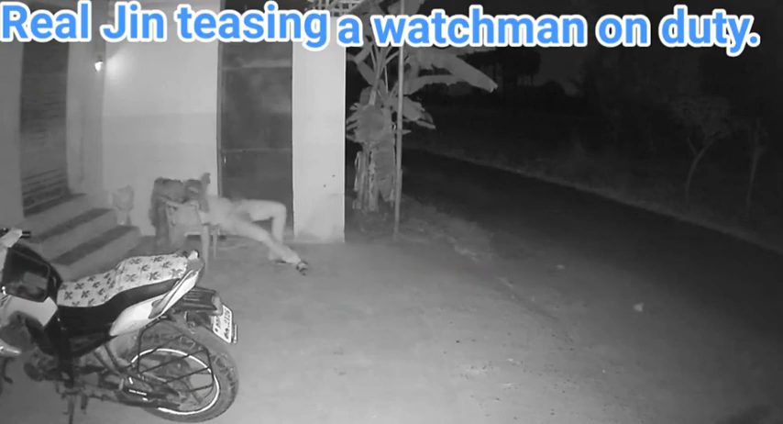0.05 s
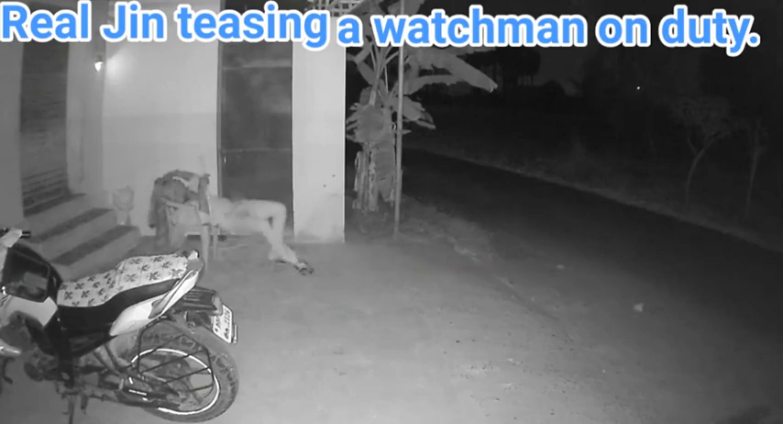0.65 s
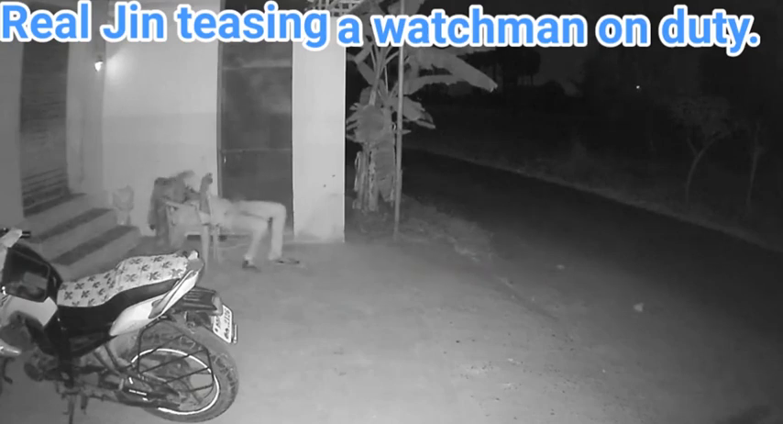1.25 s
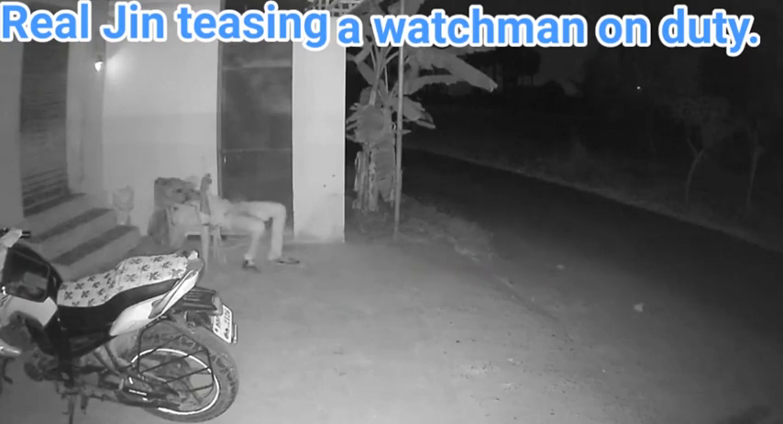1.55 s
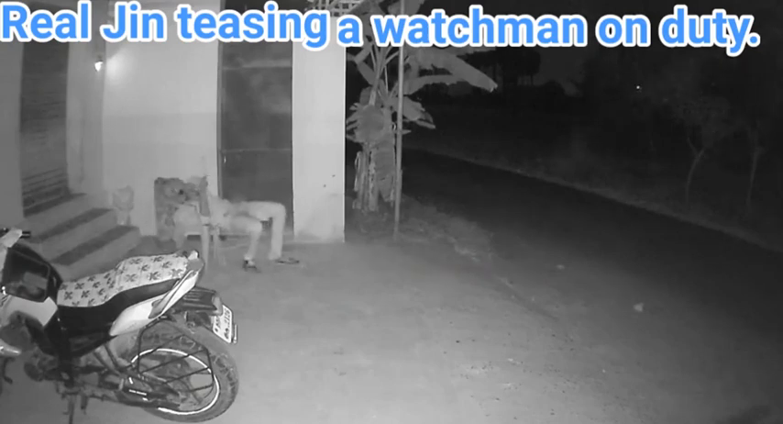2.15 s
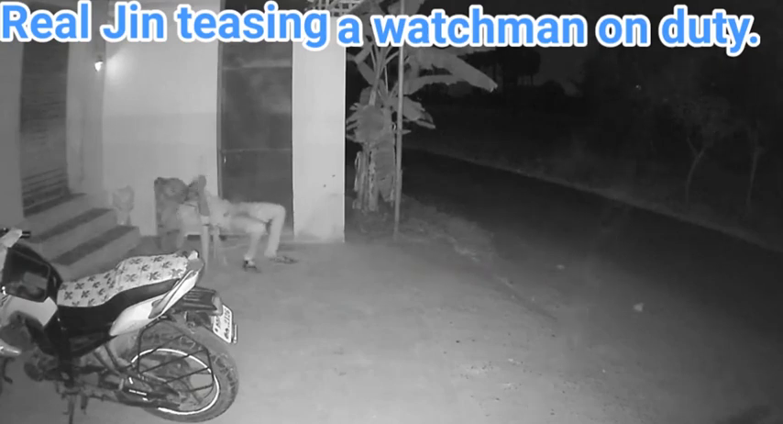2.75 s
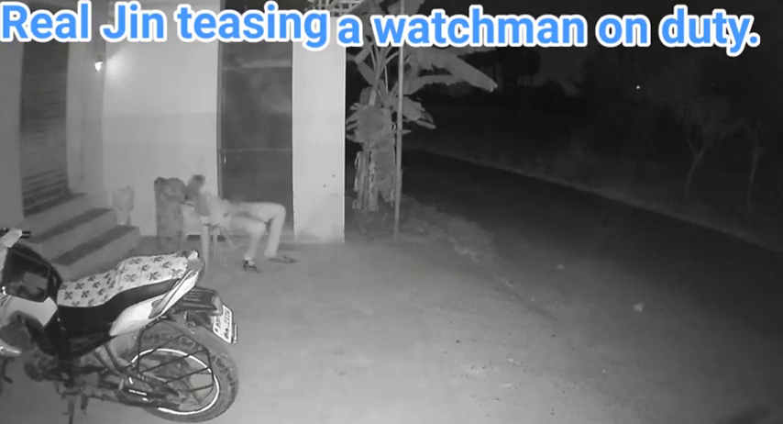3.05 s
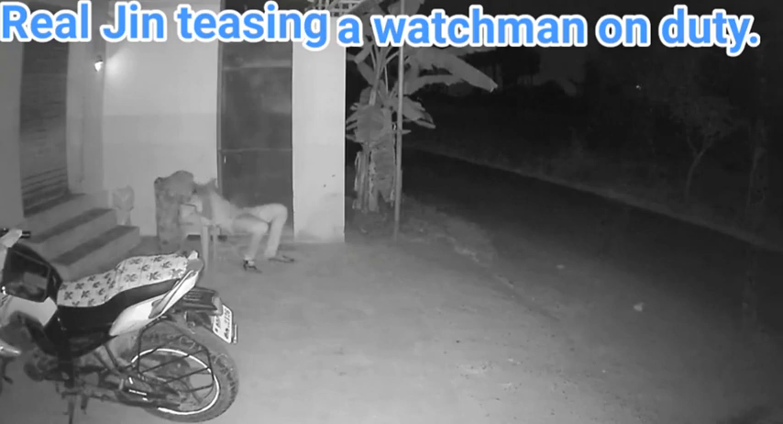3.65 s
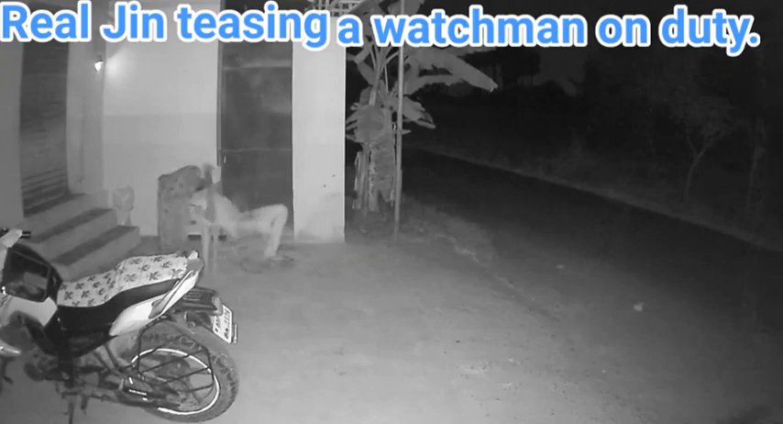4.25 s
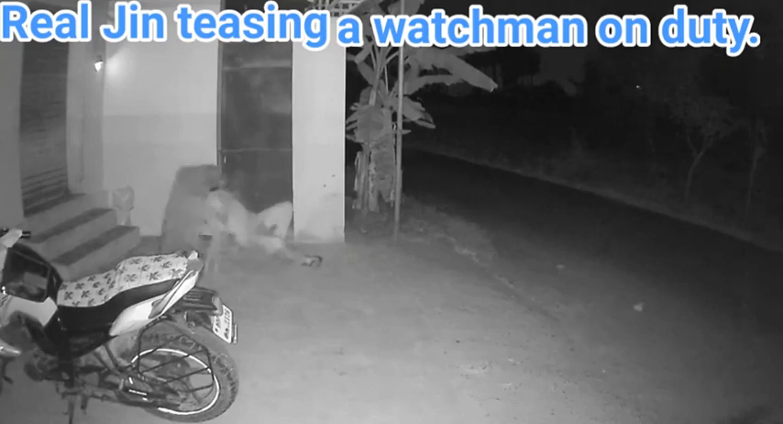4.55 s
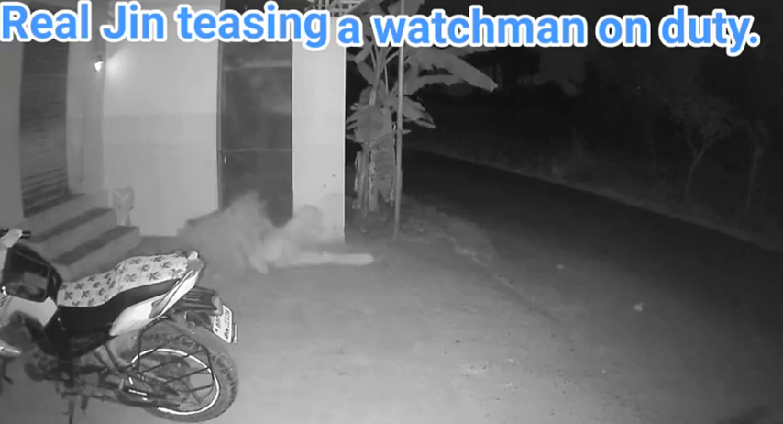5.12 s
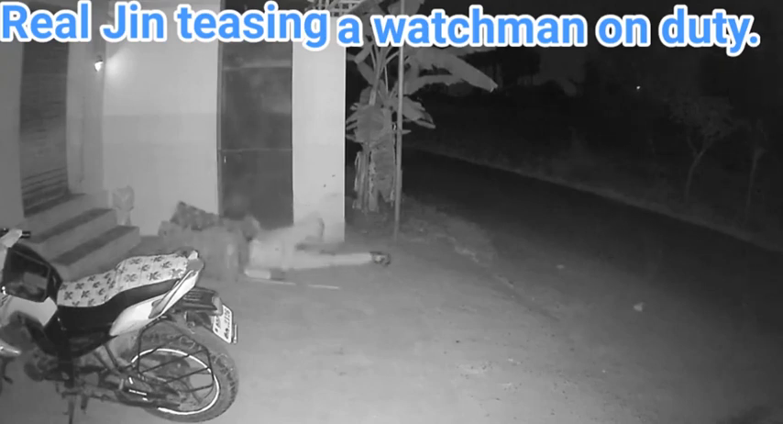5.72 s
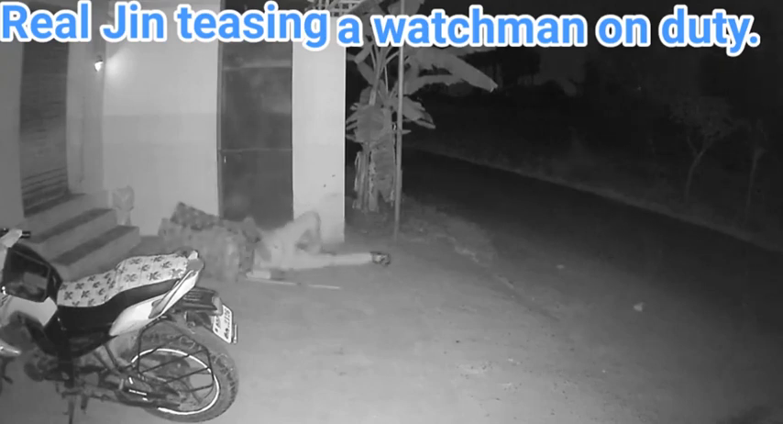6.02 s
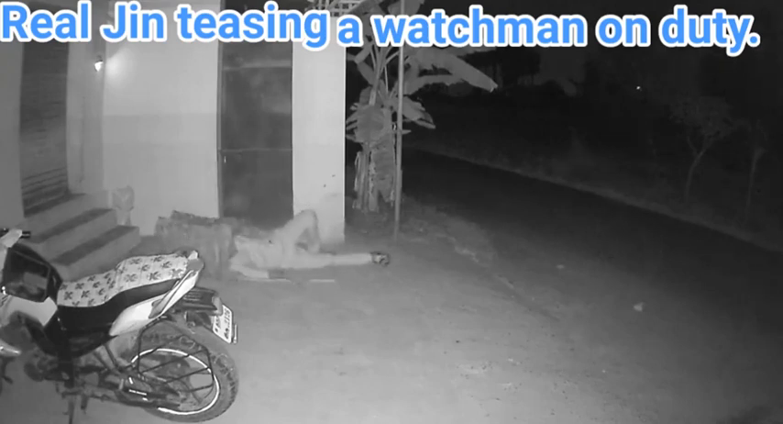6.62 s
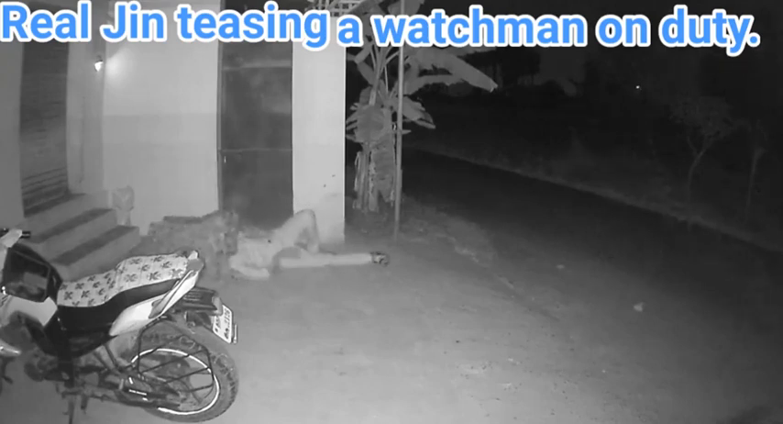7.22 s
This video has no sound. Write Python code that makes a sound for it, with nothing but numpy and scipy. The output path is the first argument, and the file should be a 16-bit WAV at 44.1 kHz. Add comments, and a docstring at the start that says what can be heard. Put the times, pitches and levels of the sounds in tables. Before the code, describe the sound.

Faint night air and microphone hiss run throughout. After light scuffs and a click at 0.4 seconds, a plastic chair judders and scrapes over a gritty floor from 0.8 to 1.8, ending in a knock and a dull thud. A quieter stretch holds a few taps around 2.5 and a bump at 3. From 3.4 the chair knocks, scrapes and groans again, with a hard, ringing knock at 4. A faint drag follows, then the chair tips and a body lands with low thuds around 4.9. Chair and body slide with a coarse, catching rumble, and a sharp, crunchy crack comes at 5.3. Dull thumps, drags and hollow clatter continue, with a loud knock at 6.5 and a last ringing one at 7. Close concrete walls add a short echo, and the security camera microphone cuts the high treble.

```python
"""A plastic chair scrapes over a gritty floor, then tips over, and the sitter thumps down.
Body and chair slide and knock about before they settle. Scrapes are tiny jerks of sticking and slipping;
knocks set the chair ringing. It is night in a concrete entrance, whose walls smear each contact.
We listen through a security camera, which cuts the high treble and distorts the hardest knocks."""
import sys
import numpy as np
from scipy import signal
from scipy.fft import rfft, irfft, next_fast_len
from scipy.io import wavfile
from scipy.ndimage import map_coordinates

SR = 44100
rng = np.random.default_rng(int(sys.argv[2]) if len(sys.argv) > 2 else 0)


def pcm_store(signal):
    """Save signal as 16-bit PCM."""
    levels = np.round(np.clip(np.atleast_2d(signal), -1, 1) * 32767)
    wavfile.write(sys.argv[1], SR, levels.astype(np.int16).T)


N = 325105

# the notes at which the scraped chair shell rings: (pitch [Hz], width [Hz], level [dB])
SHELL_NOTES = [(617, 49, 6), (980.4, 23, 8), (1230, 27, -1), (1301, 17, 3), (1770, 38, -1), (2274, 13, -8),
               (2474, 22, -5), (2684, 20, -2), (3230, 5.4, -3.5), (3216, 10, -6), (3300, 7.7, -6),
               (3540, 16, -8), (3570, 18, -10), (3758, 14, -10.5), (4310, 12, -15.5), (4500, 16, -14),
               (4900, 7.5, -11.5)]
# the tone of plastic rubbing on the floor: (frequency [Hz], level [dB])
RUB_TONE = [(200, -17), (500, 0.5), (750, 1), (1100, 3), (1500, -1), (2000, -4.5), (3000, -7.5),
            (5000, -44)]
# the tone of grinding sand: (frequency [Hz], level [dB])
GRIT_TONE = [(800, -20.5), (1600, -1.5), (2300, -2.5), (3200, 1.5), (4200, -1.5), (5200, -8.5)]
BASS_T60_S = 0.27  # the entrance holds the bass; a "t60" is the time a sound takes to fade by 60 dB


def amp(db):
    """Turn decibels into a gain."""
    return 10 ** (np.asarray(db) / 20)


def unit(x):
    """Scale x to an average (rms) level of 1."""
    return x / np.sqrt(np.mean(x ** 2) + 1e-20)


def filtered(x, response):
    """Filter x; response(f) says how much of each frequency gets through."""
    size = next_fast_len(len(x) + 8192)
    return irfft(rfft(x, size) * response(np.fft.rfftfreq(size, 1 / SR)), size)[:len(x)]


def coloured(x, tone):
    """Give x a tone drawn as (frequency [Hz], level [dB]) points, at level 1."""
    hz, db = np.transpose(tone)
    return unit(filtered(x, lambda f: amp(np.interp(np.log(f + 1), np.log(hz), db))))


def resonance(f, centre, width):
    """A filter that rings at one note; the narrower it is, the longer it rings."""
    return 1j * f * width / (centre ** 2 - f ** 2 + 1j * f * width)


def plastic(notes):
    """A filter that rings at many notes, as hollow plastic does."""
    return lambda f: sum(amp(db) * resonance(f, hz, width) for hz, width, db in notes)


def camera_band(f, top_hz=5040):
    """The camera's filter: it keeps the range of speech and cuts steeply above it."""
    return 1 / np.sqrt(1 + (f / top_hz) ** 220)


def add(out, start_s, x):
    """Mix x into out at the given time."""
    start = max(round(start_s * SR), 0)
    out[start:start + len(x)] += x[:N - start]


def wobble(size, rate):
    """A smooth curve through `rate` random points a second."""
    return map_coordinates(rng.standard_normal(400), [np.arange(size) * rate / SR])


def ringing(envelope, response):
    """Many overlapping notes and echoes: filtered noise whose level follows the envelope."""
    noise = filtered(rng.standard_normal(len(envelope)) * envelope, response)
    return unit(noise) * np.sqrt(np.mean(envelope ** 2))


def slips(size, rate, spread_db):
    """Sticking and slipping: about `rate` tiny jerks a second, at random moments and of uneven size."""
    happens = rng.random(size) < rate / SR
    strength = amp(spread_db * np.clip(rng.standard_normal(size), -2, 2))
    direction = rng.choice([-1, 1], size)
    return unit(happens * direction * strength)


def entrance(x, echo_db=2.0, t60=0.12, spots=4):
    """Close concrete walls add a tail of echoes that changes as the chair moves from spot to spot."""
    t = np.arange(SR // 7) / SR
    tails = rng.standard_normal((spots, len(t))) * amp(-60 * t / t60) * (t > .003)
    tails /= np.linalg.norm(tails, axis=1, keepdims=True)
    place = np.linspace(0, spots - 1, len(x))
    nearness = np.sqrt(np.maximum(1 - np.abs(place - np.arange(spots)[:, None]), 0))
    echoes = signal.fftconvolve(x * nearness, tails, axes=1).sum(0)[:len(x)]
    return unit(x + amp(echo_db) * echoes)


def friction(size, rate, spread_db):
    """A run of slips as it sounds between the walls."""
    return entrance(slips(size, rate, spread_db))


def stroke(length, fade_db, rise, t60):
    """A gate that opens, holds and closes, and an effort that fades (or grows, if fade_db is negative)."""
    t = np.arange(round((length + .25) * SR)) / SR
    gate = np.minimum(t / rise, 1) * amp(-60 * np.maximum(t - length, 0) / t60)
    effort = amp(-fade_db * np.minimum(t, length))
    return gate, effort


def noise_swells(table, t60, body=camera_band):
    """Bursts of noise that swell and die away, as a soft contact does when weight comes on it."""
    out, t = np.zeros(N), np.arange(SR * 2 // 3) / SR
    for start, db, hz, q, rise in table:
        envelope = np.minimum(t / rise, 1) * amp(-60 * np.maximum(t - rise, 0) / t60)
        add(out, start, amp(db) * ringing(envelope, lambda f: resonance(f, hz, hz / q) ** 2 * body(f)))
    return out


def night(level_db=-45.5):
    """Still night air and microphone hiss."""
    # the tone of the steady noise: (frequency [Hz], level [dB])
    air_tone = [(20, -16.5), (35, -13), (60, 0), (130, 5.5), (225, 2.5), (262, 3.5), (300, 0.5),
                (500, -2.5), (1000, -5), (2000, -8.5), (3500, -8), (5200, -13)]
    return amp(level_db) * coloured(rng.standard_normal(N), air_tone)


def scuffs_and_smear():
    """Brief brushes over the floor; the swell at 7.022 s is the camera smearing the last knock early."""
    # each swell of noise: (time [s], level [dB], pitch [Hz], sharpness [Q], rise [s])
    swells = [(0.0, -42, 1360, 0.54, 0.00083), (0.104, -28.5, 935, 2.4, 0.025),
              (0.79, -26, 1250, 6.9, 0.08), (0.84, -35.5, 3810, 1.9, 0.049),
              (1.017, -21.5, 760, 0.65, 0.015), (1.028, -18, 3070, 1.4, 0.032),
              (1.07, -20, 3000, 1.7, 0.018), (2.03, -43.5, 1790, 0.35, 0.074),
              (2.505, -27.5, 2570, 0.097, .06), (2.99, -20.5, 1050, 1.83, 0.0086),
              (3.366, -29, 1950, 1.64, 0.033), (3.425, -22.5, 750, 0.76, 0.026),
              (3.462, -22.5, 2300, 1.6, 0.013), (3.74, -28, 1800, 1.7, 0.019),
              (4.91, -16.5, 3360, 0.63, 0.049), (5.1, -25, 1210, 1.6, 0.007),
              (5.49, -24.5, 3000, 2.2, 0.011), (5.764, -18.5, 1930, 0.68, 0.026),
              (5.9, -28.5, 2970, 1, 0.028), (6.078, -23, 1120, 1.4, 0.014), (6.378, -27, 2400, 0.54, 0.025),
              (6.87, -44, 950, 0.17, 0.075), (7.022, -22.5, 2400, 1.37, 0.03)]
    return noise_swells(swells, t60=0.24)


def skids():
    """A leg breaks free and skids, ringing the high notes of the shell."""
    # each skid: (time [s], level [dB], pitch [Hz], sharpness [Q], rise [s])
    leg_skids = [(1.03, -18.5, 3500, 0.86, 0.02), (1.07, -20.5, 3580, 0.81, 0.017),
                 (4.915, -23, 3800, 0.98, .04)]
    return noise_swells(leg_skids, t60=0.25, body=plastic(SHELL_NOTES))


def groans(roughness=0.55, flutter_rate=85):
    """A gripping leg chatters on one note; each new grip takes another, as the load on it changes."""
    # each grip: (time [s], length [s], level [dB], first pitch [Hz], last pitch [Hz])
    grips = [(0.80, 0.11, -32, 1298, 1301), (1.011, 0.04, -23.5, 622, 616), (3.586, 0.19, -30, 969, 991),
             (3.588, 0.056, -27, 532.6, 551), (3.631, 0.11, -25, 614, 607), (3.742, 0.035, -23, 593, 584),
             (3.792, 0.099, -30, 366, 312), (4.892, 0.09, -25, 233, 259), (5.008, 0.069, -22.5, 299, 304),
             (5.097, 0.039, -20.5, 385, 408), (5.15, 0.029, -21.5, 826, 808), (5.188, 0.028, -19, 410, 409),
             (5.226, 0.02, -20, 463, 466), (6.51, 0.043, -22.5, 762, 732)]
    out = np.zeros(N)
    for start, length, db, *glide_hz in grips:
        gate, _ = stroke(length, fade_db=0, rise=0.015, t60=0.15)
        t = np.arange(len(gate)) / SR
        swell, waver = wobble(len(t), flutter_rate), wobble(len(t), flutter_rate)
        phase = 2 * np.pi * np.cumsum(np.interp(t, [0, length], glide_hz)) / SR
        note = (1 + roughness * swell) * np.sin(phase) + roughness * waver * np.cos(phase)
        add(out, start, amp(db) * gate * unit(note))
    return out


def pushes(judder_db=-2, shell_db=-6.5, rub_db=-6, catch_db=2.0, floor_share=0.37):
    """The loaded legs judder, grind over sand and set the shell ringing in fits and starts."""
    # each push: (time [s], length [s], level [dB], fade [dB/s], extra judder [dB], grit [dB])
    shoves = [(0.757, .14, -26, -17, -15, -20), (0.949, 0.34, -24, 0, -9.5, -10.5),
              (1.299, 0.44, -28.5, 33.5, -1.5, -5.5), (3.377, 0.086, -30.5, -120, -2.5, -29.5),
              (3.565, 0.22, -21.5, 10.5, -5, -27), (3.744, 0.27, -29, 13.5, 0, -5.5)]
    # the tone of the shaking legs: (frequency [Hz], level [dB])
    judder_tone = [(20, -24), (45, -17.5), (85, 4), (160, 2), (300, -3), (450, -4.5), (700, -6),
                   (1500, -44)]
    out = np.zeros(N)
    for start, length, db, fade_db, load_db, grit_db in shoves:
        gate, effort = stroke(length, fade_db, rise=0.048, t60=0.65)
        legs = friction(len(gate), rate=700, spread_db=4.5)
        shell = unit(filtered(legs, plastic(SHELL_NOTES)))
        rub = coloured(friction(len(gate), rate=1300, spread_db=0.5), RUB_TONE)
        sand = coloured(friction(len(gate), rate=2000, spread_db=0.0), GRIT_TONE)
        floor = amp(judder_db + load_db) * coloured(legs, judder_tone) + amp(grit_db) * sand
        catching = unit(amp(catch_db * wobble(len(gate), rate=44.2)))
        ring = catching * (amp(shell_db) * shell + amp(rub_db) * rub)
        # the ring follows the effort fully, the floor noise only partly
        add(out, start, amp(db) * gate * (effort * ring + effort ** floor_share * floor))
    return out


def slides(rub_db=-0.47, sand_db=-6.0, ring_db=-3.5, catch_db=1.4):
    """Pressed under the body, the chair rumbles and rings lower: a coarse rub that catches and lets go."""
    # each slide: (time [s], length [s], level [dB], fade [dB/s], judder [dB], extra grit [dB])
    drags = [(4.099, 0.65, -41.5, 31, -0.5, 10), (4.548, 0.096, -45, -39, 2.5, 10.5),
             (4.683, 0.068, -49.5, 4, -3, 13.5), (4.87, 0.26, -31, -10.5, 3, 10),
             (5.099, 0.19, -25, -0.5, 2, 0), (5.312, 0.19, -29, -19, -5, 9),
             (5.486, 0.19, -23, 12, -0.5, 0), (5.802, 0.32, -38.5, 0, -1, 9),
             (6.085, 0.37, -25, 0, -1, 0.5), (6.524, 0.073, -25.5, 71, -0.5, 7.5)]
    # the tone of the juddering weight: (frequency [Hz], level [dB])
    judder_tone = [(20, -40.5), (45, -17), (85, -4), (160, 2.5), (260, 4), (400, 1.5), (520, -3),
                   (700, -6.5), (1500, -44.5)]
    # the notes of the chair on its side under the body: (pitch [Hz], width [Hz], level [dB])
    pinned_notes = [(258, 24, 1.5), (415.6, 22, 3), (497, 28, 3), (618, 30, -2.5), (728, 22, -4),
                    (812, 22, -2.5), (1045, 33, -2.5), (1323, 22, -3.5), (1840, 30, -6), (2090, 19, -10),
                    (3860, 40, -12), (4080, 10, -13.5), (4630, 40, -12.5), (4770, 34, -16)]
    out = np.zeros(N)
    for start, length, db, fade_db, load_db, grit_db in drags:
        gate, effort = stroke(length, fade_db, rise=0.0059, t60=0.35)
        judder = amp(load_db) * coloured(friction(len(gate), rate=500, spread_db=1.0), judder_tone)
        rub = amp(rub_db) * coloured(friction(len(gate), rate=400, spread_db=2.5), RUB_TONE)
        jerks = slips(len(gate), rate=700, spread_db=0.5)
        shell = amp(ring_db) * unit(filtered(jerks, plastic(pinned_notes)))
        sand = amp(sand_db + grit_db) * coloured(friction(len(gate), rate=1000, spread_db=4), GRIT_TONE)
        catching = unit(amp(catch_db * wobble(len(gate), rate=60.2)))
        add(out, start, amp(db) * gate * effort * catching * (judder + rub + shell + sand))
    return out


def thumps():
    """Feet, limbs and trunk land with soft, dull blows."""
    # each blow: (time [s], level [dB], pitch [Hz], sharpness [Q], rise [s])
    soft_blows = [(0.0, -39, 382, 3.4, 0.005), (0.11, -32, 400, 0.79, 0.018),
                  (0.379, -37, 326, 0.64, 0.0039), (0.661, -33, 444, 2.6, 0.0023),
                  (1.335, -16, 215, 0.84, 0.017), (1.345, -22, 98, 2.2, 0.018),
                  (1.408, -24, 530, 1.15, 0.0065), (1.866, -15, 215, 0.94, 0.0023),
                  (1.878, -23, 420, 3, 0.0067), (1.97, -31, 220, 0.52, 0.025),
                  (2.05, -34, 225, 0.41, 0.011), (2.635, -34.5, 387, 0.56, 0.041),
                  (2.99, -22, 367, 1.1, 0.013), (3.45, -16.5, 250, 1.8, 0.034),
                  (3.482, -20.5, 492, 2.1, 0.004), (3.785, -17.5, 337, 1.46, 0.031),
                  (4.167, -32, 320, 0.47, 0.0024), (4.872, -19.5, 168, 2.1, 0.0073),
                  (5.002, -20, 240, 0.53, 0.0057), (5.105, -21, 94, 2.2, 0.0071),
                  (5.497, -16.5, 476, 5.7, 0.018), (5.60, -23.5, 258, 1.7, 0.011),
                  (5.763, -15.5, 405, 0.55, 0.0054), (5.885, -25.5, 218, 1.1, 0.014),
                  (6.145, -20.5, 196, 1.2, 0.025), (6.24, -19, 174, 1.4, 0.014),
                  (6.355, -21, 149.4, 3.3, 0.019), (6.503, -17, 286, 0.52, 0.011),
                  (6.865, -27, 335, 0.55, 0.034), (6.965, -34, 377, 0.53, 0.013),
                  (7.036, -22.5, 436, 0.38, 0.0052)]
    return noise_swells(soft_blows, BASS_T60_S)


def thuds(rise_cycles=0.082, echo_db=-17.5):
    """Seat and body hit the floor: a few low notes die fast, and the walls answer faintly."""
    # each blow: (time [s], level [dB], lowest pitch [Hz], t60 [s])
    firm_blows = [(1.865, -12.5, 272, 0.091), (1.877, -15, 377, 0.2), (3.015, -19, 337, 0.084),
                  (3.512, -15, 214, .12), (4.05, -7.5, 296, 0.048), (4.848, -9, 84, 0.089),
                  (4.874, -12.5, 152.5, 0.079), (5.008, -14.5, 128.5, 0.13), (5.118, -19.5, 112, 0.1),
                  (5.238, -20.5, 348, 0.07), (5.516, -23, 410, 0.044), (5.595, -15, 202, 0.092),
                  (5.895, -13.5, 147, 0.12), (5.952, -23, 155, 0.13), (6.141, -13.5, 167, 0.11),
                  (6.201, -22, 90.7, 0.2), (6.241, -13.5, 151, .1), (6.284, -16, 151, 0.06),
                  (6.545, -17, 245.7, 0.22)]
    # the notes of one blow: (pitch [times the lowest], level [dB])
    notes = [(1, 1), (1.35, -5), (1.82, -3.5)]
    out, t = np.zeros(N), np.arange(SR // 2) / SR
    for start, db, hz, t60 in firm_blows:
        onset = 1 - np.exp(-t * hz / rise_cycles)  # heavier, lower blows come on more slowly
        swing = sum((-1) ** k * amp(note_db) * np.sin(2 * np.pi * ratio * hz * t)
                    for k, (ratio, note_db) in enumerate(notes))
        echo_level = onset * amp(echo_db - 60 * t / BASS_T60_S)
        echo = ringing(echo_level, lambda f: resonance(f, 2 * hz, 2 * hz) ** 2)
        add(out, start, amp(db) * (onset * amp(-60 * t / t60) * swing + echo))
    return out


def knocks(snap_db=9):
    """The chair hits hard: a snap, the clatter of shell and walls, and the ring of its frame."""
    # each hit: (time [s], level [dB], pitch [Hz], sharpness [Q], t60 [s], frame over clatter [dB])
    hits = [(0.379, -24.5, 4700, 0.4, 0.17, -13), (0.413, -31.5, 4740, 8, 0.14, -6),
            (1.704, -18, 2770, 2.1, 0.047, -15.5), (1.711, -22.5, 3070, 2.9, 0.054, -16),
            (1.863, -22.5, 1830, 6.1, 0.06, -24), (1.868, -24.5, 2000, 2.5, 0.04, -24),
            (1.871, -17, 615, 2.6, 0.054, -17), (2.432, -32.5, 2260, 1.16, 0.3, -12),
            (2.462, -36, 3000, 0.9, 0.066, -16), (2.486, -22, 2820, 1.6, 0.1, -19.5),
            (2.558, -29, 3000, 0.9, 0.07, -12), (3.469, -14.5, 1610, 0.71, 0.1, -15),
            (4.048, -16.5, 1540, 1.8, 0.18, 0), (4.05, -16, 3380, 1.06, 0.2, -3),
            (4.837, -27, 2000, 0.1, 0.2, -2), (4.859, -14, 1160, 0.7, 0.096, -10.5),
            (5.005, -14.5, 1200, 0.47, 0.048, -11), (5.103, -30, 1900, 0.62, 0.064, -3.5),
            (5.303, -10.5, 3700, 0.32, 0.19, -22), (5.504, -20, 3250, 0.89, 0.068, -8),
            (5.574, -21.5, 1370, 3, 0.086, -3), (5.589, -20.5, 1200, 2.7, 0.071, -12.5),
            (5.767, -22, 544, 3.2, 0.2, -4), (6.142, -23.5, 1300, 1.9, 0.43, -5),
            (6.274, -24.5, 1060, 6.3, 0.06, -9), (6.391, -25.5, 1400, 1.2, 0.14, 4),
            (6.496, -16, 2230, 2.8, 0.073, -3), (6.515, -22.5, 1560, 2, 0.11, 4),
            (6.533, -22, 2300, 2.2, 0.08, -12), (6.544, -9, 2350, 0.81, 0.065, -11),
            (6.886, -48, 806, 1.3, 0.076, -9), (7.033, -14.5, 1560, 3, 0.24, -4.5)]
    # the notes of the struck frame: (pitch [Hz], level [dB], t60 [s])
    frame_notes = [(434, 9.5, 0.14), (732, -1, 0.076), (916, -2.5, 0.15), (1058, -0.5, .18),
                   (1510, -6, 0.14), (1590, -4.5, 0.12), (1756, 2.5, .15), (2170, -8.5, 0.053),
                   (2330, 1.5, 0.14), (2640, -5, 0.11), (3000, -4.5, 0.087)]
    note_hz, note_db, note_t60 = np.transpose(frame_notes)[:, :, None]
    out, t = np.zeros(N), np.arange(SR // 2) / SR
    click = 1. * (t == t[40])
    onset = 1 - np.exp(-t / 0.0021)
    for start, db, hz, q, t60, ring_db in hits:
        body = lambda f: resonance(f, hz, hz / q) ** 2 * camera_band(f)
        snap = filtered(click, body)
        snap /= np.abs(snap).max()
        clatter = ringing(amp(-60 * t / t60) * onset, body)
        closeness = np.abs(resonance(note_hz, hz, 2 * hz))  # favours notes near the hit's pitch
        gains = amp(note_db + rng.normal(0, 2, note_hz.shape)) * closeness
        waves = np.sin(2 * np.pi * (note_hz * t + rng.random(note_hz.shape)))
        notes = gains * amp(-60 * t / note_t60) * waves
        frame = onset * notes.sum(0) / np.sqrt(np.sum(gains ** 2) / 2)
        add(out, start, amp(db) * (clatter + amp(ring_db) * frame + amp(snap_db) * snap))
    return out


def crunch(hz=5120, top_hz=12500, t60=0.065):
    """Some of the hard knocks carry a short, rough fizz in the treble."""
    # each fizz: (time [s], level [dB], sharpness [Q])
    bursts = [(0.375, -32, 24), (3.467, -60, 1), (4.05, -41, 2.1), (5.303, -27.5, 0.77), (6.496, -56, 5),
              (6.544, -42.5, 1.7), (7.033, -58, 2.3)]
    out, t = np.zeros(N), np.arange(SR // 4) / SR
    for start, db, q in bursts:
        fizz = lambda f: resonance(f, hz, hz / q) ** 2 / np.sqrt(1 + (f / top_hz) ** 10)
        add(out, start, ringing(amp(db - 60 * t / t60), fizz))
    return out


def scene():
    """Contacts, scrapes and night air meet at one microphone."""
    contacts = knocks() + thuds() + thumps() + scuffs_and_smear()
    scrapes = pushes() + slides() + groans() + skids()
    return (scrapes + contacts + night())[None]


def record(dry, peak_limit=0.78, hiss_db=-76, top_hz=15700):
    """The camera flattens the peaks and cuts the treble; above its band there is only fizz and hiss."""
    narrow = filtered(np.clip(dry[0], -peak_limit, peak_limit), camera_band)
    hiss_tone = [(6000, -8), (8500, -9.5), (11500, -10), (13500, -25.5)]  # (frequency [Hz], level [dB])
    hiss = amp(hiss_db) * coloured(rng.standard_normal(N), hiss_tone)
    return filtered(narrow + crunch() + hiss, lambda f: f < top_hz)[None]


dry = scene()
out = record(dry)
pcm_store(out)
```